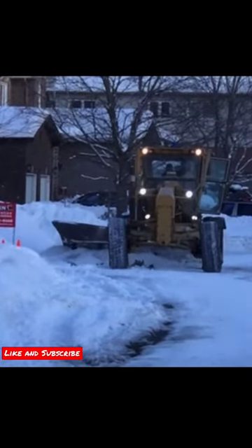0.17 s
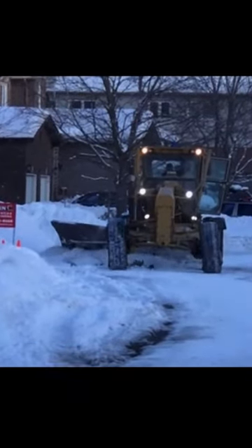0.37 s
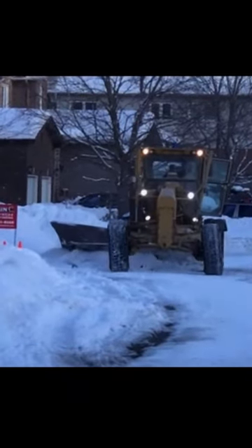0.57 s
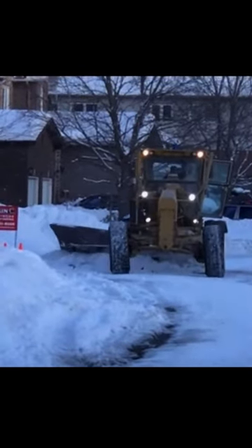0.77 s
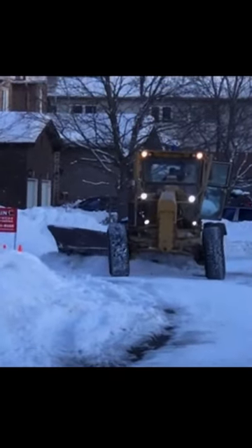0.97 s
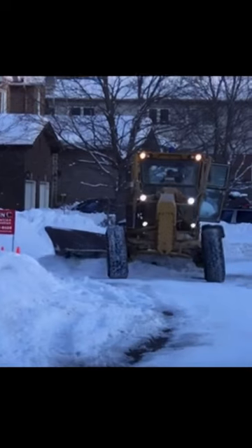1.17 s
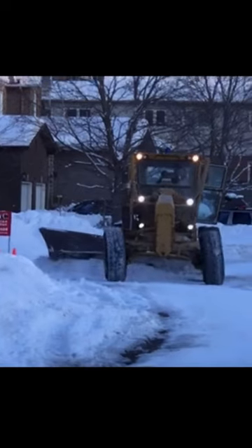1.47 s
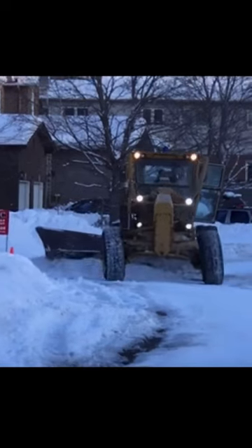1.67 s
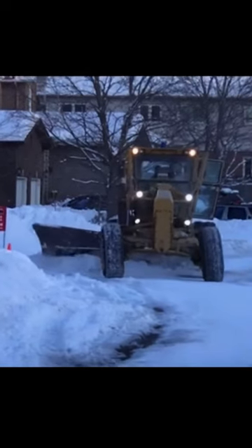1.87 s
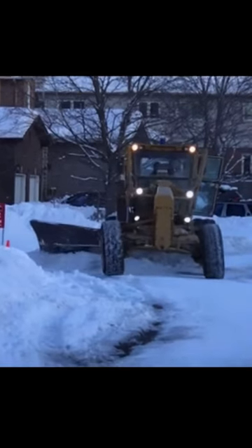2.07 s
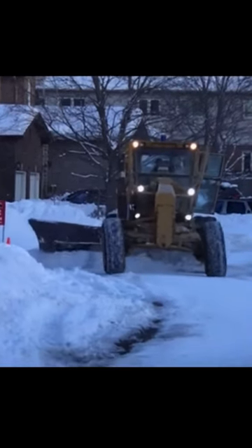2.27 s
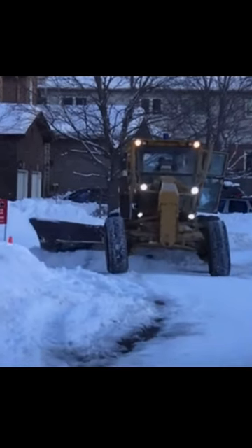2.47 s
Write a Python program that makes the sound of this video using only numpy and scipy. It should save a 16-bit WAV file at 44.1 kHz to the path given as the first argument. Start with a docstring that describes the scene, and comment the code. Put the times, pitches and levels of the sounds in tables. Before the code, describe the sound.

A heavy grader's diesel engine rumbles throughout at constant revs, a low hum and broad roar that swell and sink, with faint block clatter, tiny rattling ticks and soft treble hiss. Heavier exhaust thuds come irregularly from 0.3 s. Short gritty blade scrapes fall around 0.5-0.7, 1.1, 1.9 and 2.4 s; dull metal clunks at 1.75, 1.9 and 2.4 s. Outdoors, some way off, mono.

```python
"""A six-cylinder diesel grader creeps along a snowy street at steady revs, some way off. Throughout, sine tones
at shaft orders hum over a broad noise roar and rumble with two swelling resonances; filtered noise makes the
block's faint clatter and a treble hiss, and faint engine ticks ring the blade's modes. Heavier exhaust beats
soon thud as damped sines; then the blade drags in short scrapes of filtered grit grains, and later gives some
dull clunks of damped ringing."""
import sys
import numpy as np
from scipy import signal
from scipy.fft import rfft, irfft, next_fast_len
from scipy.io import wavfile
from scipy.ndimage import uniform_filter1d, map_coordinates

SR = 44100
rng = np.random.default_rng(int(sys.argv[2]) if len(sys.argv) > 2 else 0)


def dump(signal):
    """Clip the signal to [-1, 1] and save it as 16-bit WAV at the path in sys.argv[1]."""
    limited = np.clip(np.atleast_2d(signal).T, -1, 1)
    pcm = np.round(limited * 32767).astype(np.int16)
    wavfile.write(sys.argv[1], SR, pcm)


N = 115101
T = np.arange(N) / SR  # time, s
SHAFT_HZ = 36.22  # crankshaft turns a second


def amp(db):
    """Decibels to linear gain."""
    return 10 ** (np.asarray(db) / 20)


def unit(x):
    """x scaled to an rms of 1."""
    return x / np.sqrt(np.mean(x ** 2) + 1e-20)


def curve(rows):
    """A (start_s, value) table drawn as straight lines, one value per sample."""
    return np.interp(T, *np.transpose(rows))


def wobble(rate):
    """A smooth random curve, rate knots a second."""
    knots = rng.standard_normal(int(N * rate / SR) + 4)
    return map_coordinates(knots, [T * rate])


def filtered(x, response):
    """x times a response of frequency, padded so that the ringing does not wrap round."""
    m = next_fast_len(N + SR // 2)
    return irfft(rfft(x, m) * response(np.fft.rfftfreq(m, 1 / SR)), m)[..., :N]


def peak(centre_hz, width_hz):
    """The response of a causal resonance."""
    return lambda f: 1j * f * width_hz / (centre_hz ** 2 - f * f + 1j * f * width_hz)


def rush(spectrum, patchy_db):
    """Coloured noise of rms 1; its gain varies at random in patches of time and frequency."""
    z = signal.stft(rng.standard_normal(N), nperseg=512)[2]
    field = uniform_filter1d(rng.standard_normal(z.shape), 6, 0)  # blur over frequency
    field = uniform_filter1d(field, 10, 1)  # blur over time
    patchy = signal.istft(z * amp(patchy_db * unit(field)), nperseg=512)[1][:N]
    f, db = np.transpose(spectrum)
    log_f = np.log(f + 1)
    return unit(filtered(patchy, lambda hz: amp(np.interp(np.log(hz + 1), log_f, db))))


def hum(hz, waver_turns, level):
    """A resonance kept ringing by turbulence: a tone whose phase wanders."""
    phase_turns = hz * T + waver_turns * wobble(25)
    return np.sqrt(2) * amp(curve(level)) * np.sin(2 * np.pi * phase_turns)


# Engine tones: shaft_multiple [turns of the shaft], level_db [dB rms before flutter]
SHAFT_TONES = [(2.5, -56), (3, -44), (7.5, -57), (8, -53), (11, -66), (12, -61), (18, -66), (18.5, -68),
               (19, -70), (23, -69), (29, -71), (32, -72), (39.5, -67), (46.5, -73), (54, -70)]
DRIFT_TURNS, FLUTTER_DB = 0.0073, 1.5  # unevenness of the crank angle and of each tone
FULL_FLUTTER_ORDER = 8  # orders below this flutter less


def orders():
    """Tones locked to the slightly uneven crank."""
    turns = SHAFT_HZ * T + DRIFT_TURNS * wobble(6.27)
    out = np.zeros(N)
    for order, level_db in SHAFT_TONES:
        flutter_db = FLUTTER_DB * min(order / FULL_FLUTTER_ORDER, 1) * wobble(5.05)
        tone = np.sin(2 * np.pi * (order * turns + rng.random()))
        out += np.sqrt(2) * amp(level_db + flutter_db) * tone
    return out


# Colour of the exhaust and intake: pitch_hz [Hz], density_db [relative dB per Hz]
ROAR_SPECTRUM = [(120, -39), (170, -10.5), (200, 0), (225, -0.5), (296, -2.5), (345, -6), (389, -14.5),
                 (438, -17.5), (486, -21), (600, -22.5), (720, -21), (900, -29.5), (1200, -45),
                 (2000, -120)]
# Swell of the roar: start_s [s], level_db [dB rms before the chug]
ROAR_SWELL = [(0.03, -36), (0.15, -43), (0.38, -39), (0.88, -42), (0.91, -38.5), (0.95, -39), (1.77, -42),
              (1.79, -39), (1.83, -41), (2.22, -39), (2.27, -48.5), (2.32, -36.5), (2.37, -43.5),
              (2.47, -40), (2.56, -46.5), (2.58, -42.5)]
CHUG_DEPTH = 0.11  # swing of the roar either side of its level


def roar():
    """Broad exhaust and intake noise, chugging once an engine cycle (two turns)."""
    chug = 1 + CHUG_DEPTH * np.sin(np.pi * SHAFT_HZ * T)
    return amp(curve(ROAR_SWELL)) * chug * rush(ROAR_SPECTRUM, patchy_db=-0.3)


# Colour of the exhaust's deep end: pitch_hz [Hz], density_db [relative dB per Hz]
RUMBLE_SPECTRUM = [(10, -45), (25, -29), (45, -28), (70, -10.5), (90, -10.5), (106, -10), (125, -2),
                   (150, -1), (175, -4.5), (210, -14), (300, -120)]
# Swell of the rumble: start_s [s], level_db [dB rms of its strongest band]
RUMBLE_SWELL = [(0.03, -41.5), (0.22, -49), (0.28, -47), (0.43, -44), (0.66, -41.5), (0.69, -57),
                (0.76, -37), (0.84, -53), (0.87, -37), (0.95, -47), (1.06, -40.5), (1.21, -46),
                (1.23, -45.5), (1.41, -41), (1.69, -49), (1.78, -41), (1.89, -44.5), (1.95, -39),
                (2.16, -45), (2.58, -40.5)]
RUMBLE_OVER_DB = 0.5  # whole rumble over its strongest band


def rumble():
    """Deep exhaust noise that swells and sinks."""
    return amp(curve(RUMBLE_SWELL) + RUMBLE_OVER_DB) * rush(RUMBLE_SPECTRUM, patchy_db=0.06)


# Swell of the pipe resonance: start_s [s], level_db [dB rms]
BOOM_SWELL = [(0.05, -80), (0.16, -39), (0.4, -52), (0.79, -48), (0.84, -41), (0.93, -72), (0.99, -38.5),
              (1.23, -42), (1.26, -62), (1.43, -37.5), (1.46, -53), (1.51, -45.5), (1.73, -44.5),
              (1.78, -40), (2.0, -50), (2.38, -39), (2.44, -53), (2.55, -42.5)]


def boom():
    """A pipe resonance near the fifth order, wavering in phase."""
    return hum(180, 0.098, BOOM_SWELL)  # Hz, turns


# Swell of the body resonance: start_s [s], level_db [dB rms]
THROB_SWELL = [(0.05, -50), (0.18, -45), (0.22, -53), (0.37, -52), (0.46, -61), (0.75, -47), (0.84, -66),
               (1.0, -51), (1.47, -55), (1.52, -48), (1.66, -62), (2.09, -50), (2.12, -61), (2.29, -56),
               (2.32, -47), (2.55, -60)]


def throb():
    """A deep body resonance, wavering more widely in phase."""
    return hum(58.6, 0.23, THROB_SWELL)  # Hz, turns


# Colour of the engine block and panels: pitch_hz [Hz], density_db [relative dB per Hz]
BLOCK_SPECTRUM = [(240, -31), (400, -7.5), (435, -0.5), (479, -4.5), (585, -4.5), (664, -5), (731, -7.5),
                  (821, -3), (1310, -5.5), (1440, -5.5), (1530, -7.5), (1910, -5), (2150, -12.5),
                  (2400, -10), (2900, -13), (3500, -12.5), (3800, -19), (4400, -21.5), (5000, -28),
                  (6500, -31), (7400, -33), (8000, -45), (11000, -120)]
# Swell of the clatter: start_s [s], level_db [dB rms of its upper half]
BLOCK_SWELL = [(0.05, -55.5), (0.1, -58.5), (0.52, -57), (0.54, -55), (0.54, -58), (0.96, -56), (1.08, -58),
               (1.09, -56), (1.47, -58), (1.92, -56), (2.37, -56), (2.39, -54), (2.55, -57)]
BLOCK_OVER_DB = 7  # whole clatter over its upper half
FIRING_DEPTH = .05  # share of the clatter that pulses with the firings


def clatter():
    """Mechanical noise through the block, pulsing gently with the firings, three a turn."""
    pulse = 1 + FIRING_DEPTH * np.sin(2 * np.pi * 3 * SHAFT_HZ * T)
    level_db = curve(BLOCK_SWELL) + BLOCK_OVER_DB + 0.31 * wobble(14)
    return amp(level_db) * pulse * rush(BLOCK_SPECTRUM, patchy_db=0.7)


# Colour of the fan, air and snow under the tyres: pitch_hz [Hz], density_db [relative dB per Hz]
HISS_SPECTRUM = [(2060, -48), (3500, -9.5), (4850, -9), (6580, -10), (7400, -14), (8000, -15), (8720, -13),
                 (10100, -18), (11800, -14), (15600, -21)]
# Swell of the hiss: start_s [s], level_db [dB rms before a slight wobble]
HISS_SWELL = [(0.05, -67), (0.59, -68), (1.0, -69), (1.18, -67.5), (1.38, -67.5), (1.87, -67.5),
              (1.88, -66), (2.19, -67.5), (2.46, -66), (2.55, -68)]


def hiss():
    """Smooth treble noise of the fan, air and snow under the tyres."""
    level_db = curve(HISS_SWELL) + 0.15 * wobble(10)
    return amp(level_db) * rush(HISS_SPECTRUM, patchy_db=1.5)


# Ringing modes of the blade, for ticks and clunks:
# pitch_hz [Hz], level_db [relative dB], t60_s [s to fall 60 dB]
BLADE_MODES = [(640, 0, .035), (1090, 3, .03), (1490, 2, .03), (1900, -2, .02), (3100, -10, .015)]
TICKS_PER_S, TICK_DB = 180, -63  # mean rate; rms level of the whole layer, dB


def ticks():
    """Faint engine ticks within the clatter: random taps of uneven size ring the blade's modes."""
    t = T[:SR // 20]
    ring = np.zeros(len(t))
    for pitch_hz, level_db, t60_s in BLADE_MODES:
        ring += amp(level_db - 60 * t / t60_s) * np.sin(2 * np.pi * pitch_hz * t)
    taps = rng.standard_normal(N) * (rng.random(N) < TICKS_PER_S / SR)
    return amp(TICK_DB) * unit(signal.fftconvolve(taps, ring)[:N])


# Heavier exhaust beats: start_s [s], level_db [dB before attack and decay], pitch_hz [Hz]
EXHAUST_BEATS = [(0.281, -20, 165), (.4, -28, 250), (0.444, -27, 188), (.512, -32, 150), (.53, -25.5, 290),
                 (0.614, -29, 230), (.75, -36, 130), (0.874, -25, 135), (.91, -37, 260), (.99, -23.5, 175),
                 (1.17, -31, 179), (1.42, -29, 198), (1.778, -24, 191), (1.81, -29, 170), (1.836, -33, 200),
                 (1.895, -26, 180), (1.983, -38, 220), (2.19, -25, 178), (2.29, -27, 202),
                 (2.321, -27, 199), (2.52, -25, 120), (2.57, -20.5, 119)]
THUD_ATTACK_S, THUD_T60_S = 0.0072, 0.079  # rise time constant; time to fall 60 dB


def thuds():
    """Each heavier beat rings the pipe for a few cycles."""
    out = np.zeros(N)
    for start_s, level_db, pitch_hz in EXHAUST_BEATS:
        t = np.maximum(T - start_s, 0)
        attack = 1 - np.exp(-t / THUD_ATTACK_S)
        out += amp(level_db - 60 * t / THUD_T60_S) * attack * np.sin(2 * np.pi * pitch_hz * t)
    return out


# Blade scrapes: start_s [s], length_s [s], level_db [dB rms of the grit before shaping], pitch_hz [centre, Hz]
BLADE_SCRAPES = [(.515, .04, -61, 3000), (.62, .14, -69, 5500), (.633, .012, -61, 3200),
                 (.672, .03, -57, 2700), (.668, .04, -64, 4600), (1.115, .05, -55, 1300),
                 (1.18, .05, -67, 4500), (1.879, .035, -49, 1400), (1.882, .03, -60, 3200),
                 (1.885, .03, -75, 11000), (1.92, .03, -53, 1400), (2.385, .03, -53, 1800),
                 (2.45, .03, -55, 900), (2.51, .03, -77, 11000)]
GRAINS_PER_S = 1400  # mean rate of grit grains


def scrapes():
    """Random grit grains through a thrice-applied resonance, shaped into quick-rising bursts."""
    out = np.zeros(N)
    for start_s, length_s, level_db, pitch_hz in BLADE_SCRAPES:
        grit = rng.standard_normal(N) * (rng.random(N) < GRAINS_PER_S / SR)
        band = peak(pitch_hz, 0.8 * pitch_hz)
        grating = unit(filtered(grit, lambda f: band(f) ** 3))
        progress = np.clip((T - start_s) / length_s, 0, 1)
        burst = np.sin(np.pi * progress ** 0.47)  # the power brings the crest forward
        out += amp(level_db) * burst * grating
    return out


# Blade clunks: start_s [s], level_db [dB, 10 above the reference of the modes]
BLADE_CLUNKS = [(1.752, -43), (1.879, -34.5), (1.924, -41), (2.388, -41)]


def clunks():
    """Dull knocks ring the blade's damped modes, each mode varying a little in strength."""
    out = np.zeros(N)
    for start_s, level_db in BLADE_CLUNKS:
        t = np.maximum(T - start_s, 0)
        for pitch_hz, mode_db, t60_s in BLADE_MODES:
            strike_db = level_db - 10 + mode_db + rng.normal(0, 1.4)
            out += amp(strike_db - 60 * t / t60_s) * np.sin(2 * np.pi * pitch_hz * t)
    return out


def scene():
    """All the layers summed to one channel."""
    engine = orders() + roar() + rumble() + boom() + throb() + clatter() + thuds()
    blade = ticks() + scrapes() + clunks()
    return (engine + hiss() + blade)[None]


def record(dry):
    """A sharp band limit: nothing passes at or above 15780 Hz."""
    return filtered(dry, lambda hz: hz < 15780)


dry = scene()
out = record(dry)
dump(out)
```